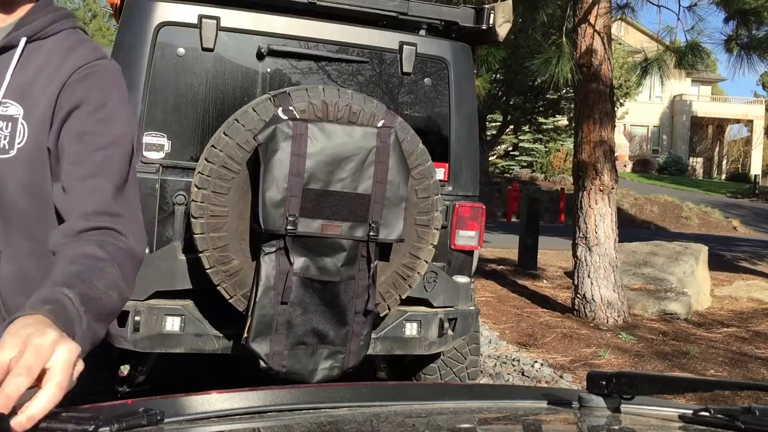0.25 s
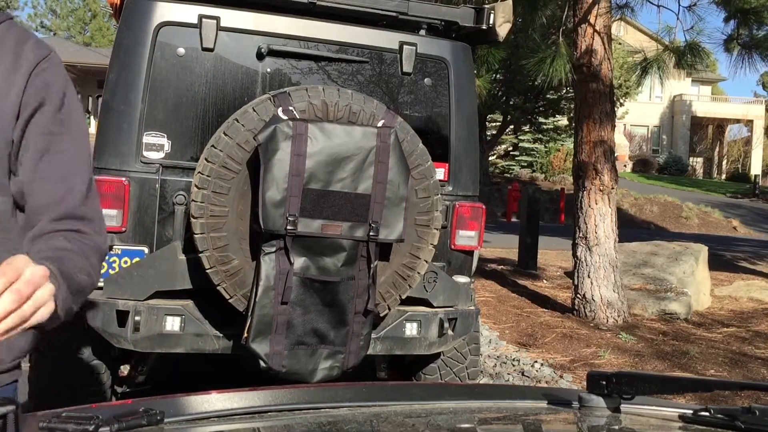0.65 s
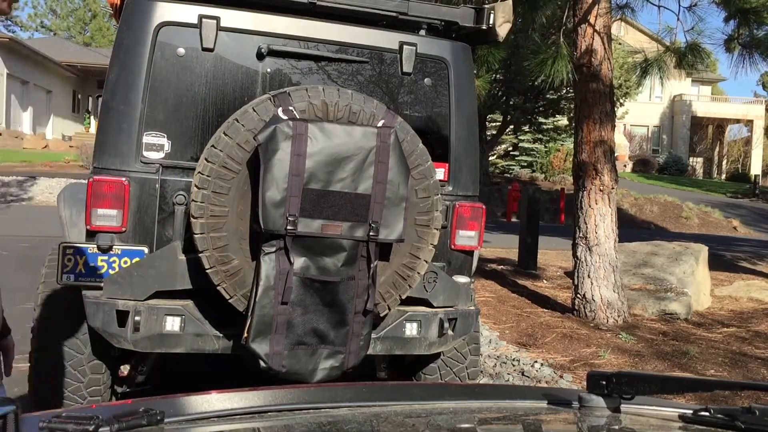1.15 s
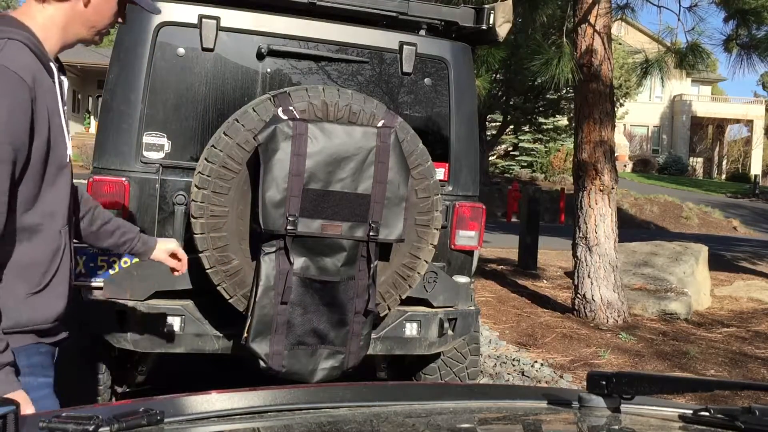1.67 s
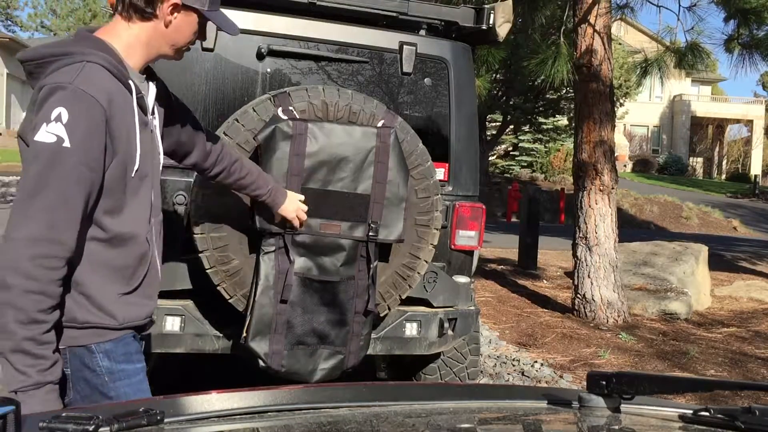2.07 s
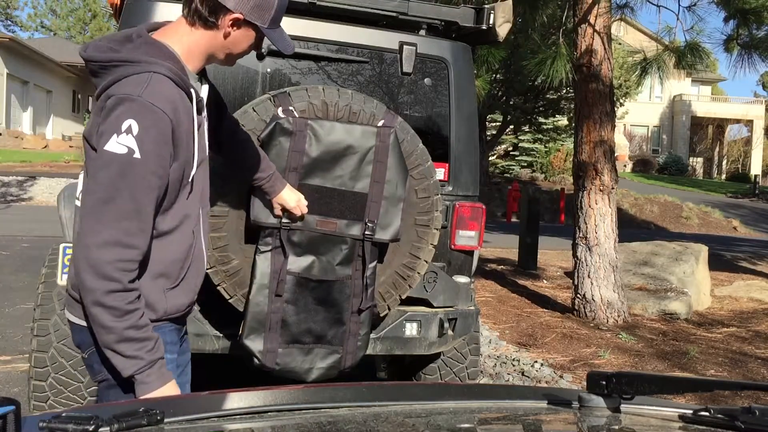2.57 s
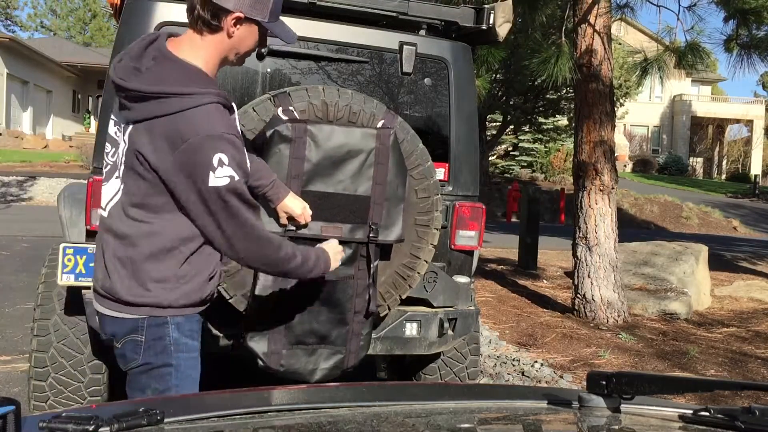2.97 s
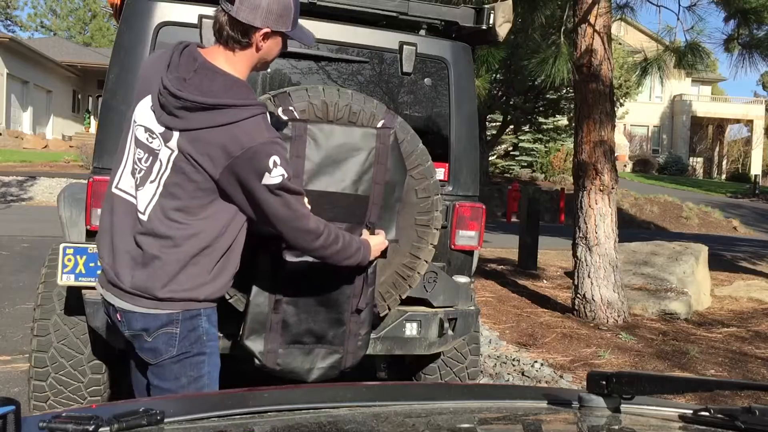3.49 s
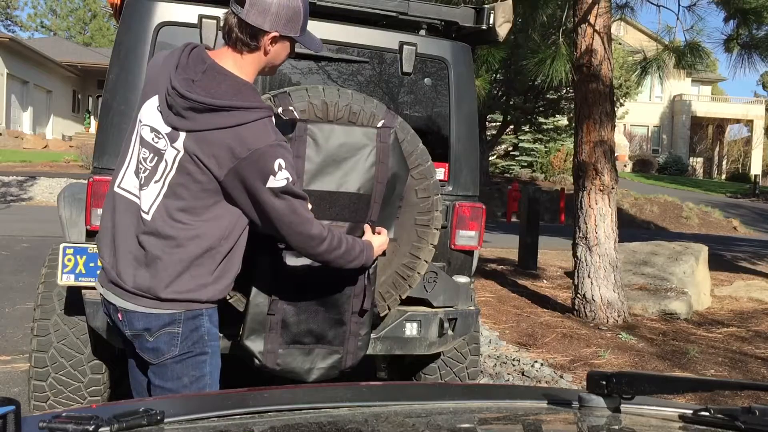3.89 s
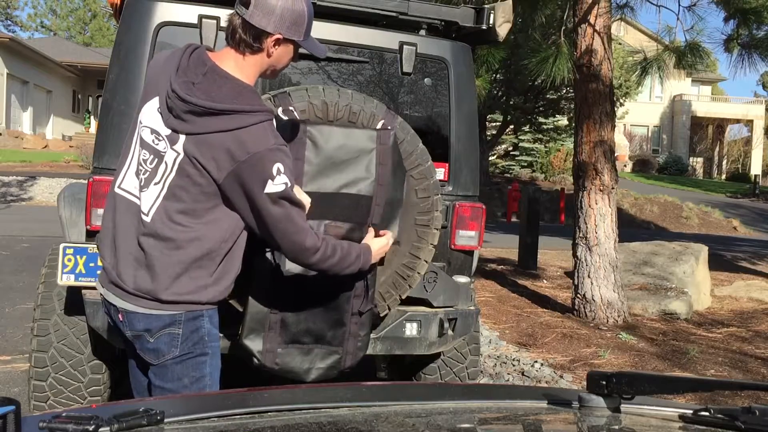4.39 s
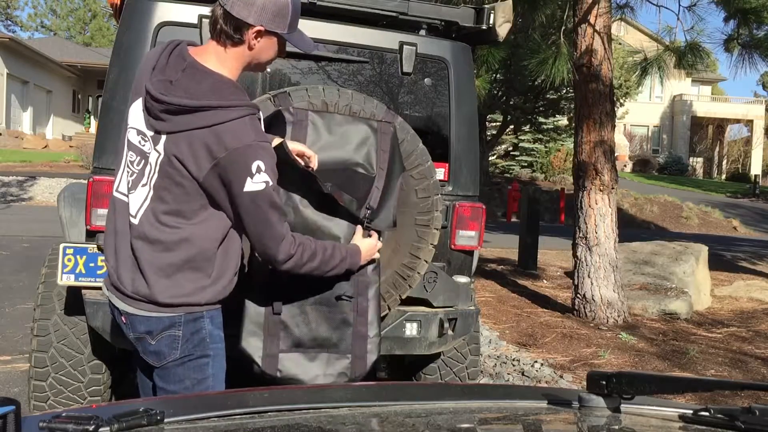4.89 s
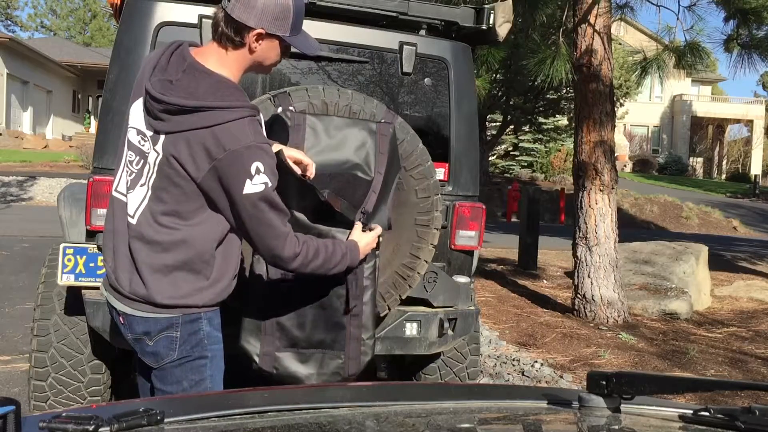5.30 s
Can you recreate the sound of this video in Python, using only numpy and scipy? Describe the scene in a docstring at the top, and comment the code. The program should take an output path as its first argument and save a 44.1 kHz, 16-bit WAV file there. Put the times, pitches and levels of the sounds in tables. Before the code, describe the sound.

Outdoors, something clatters loudly on sheet metal near the microphone; afterwards a nylon bag is quietly handled, with a plastic click and webbing swish.

```python
"""Outdoors, at a car: something scrapes on the steel hood and knocks it a few times.
Noise bursts and ringing panel modes make the knocks; rough noise keeps the modes ringing in the scrape.
A few steps away a nylon bag is handled: shaped noise for rubs, tugs, pats and a long strap pull,
and short ringing modes for a plastic buckle that snaps shut.
A faint low hum of three sines swells and sinks, far birds whistle as gliding sines, and air noise lies below."""
import sys
import numpy as np
from scipy import signal
from scipy.fft import rfft, irfft, next_fast_len
from scipy.io import wavfile
from scipy.ndimage import map_coordinates

SR = 44100
rng = np.random.default_rng(int(sys.argv[2]) if len(sys.argv) > 2 else 0)


def waveform_to_disk(signal):
    """Save audio, clipped to [-1, 1], as 16-bit WAV at the path in sys.argv[1]."""
    frames = np.transpose(np.atleast_2d(signal))
    scaled = np.clip(frames, -1, 1) * 32767
    samples = np.round(scaled).astype(np.int16)
    wavfile.write(sys.argv[1], SR, samples)


N = 244578  # length of the scene in samples
SIZE = 2 ** 15  # length of one short sound in samples
TOP_HZ = 16100  # upper limit of the sound
TIME = np.arange(N) / SR  # s from the start of the scene
AGE = np.arange(SIZE) / SR  # s from the start of a short sound
FREQ = np.fft.rfftfreq(SIZE, 1 / SR)  # Hz

# Ways in which the hood panel vibrates: f/Hz, level/dB, time to fall by 60 dB/s
HOOD_MODES = [(52, -24, .35), (84, -19, .3), (118, -12, .24), (168, -6, .18), (220, -6.5, .18),
              (247, -9, .2), (325, -6, .15), (372, -3, .14), (440, -9, .1), (531, -1, .1), (556, -2, .11),
              (592, -2, .12), (690, -10, .09), (787, -8, .09), (961, -5, .08), (1005, -6, .11),
              (1065, -9, .11), (1185, -3, .09), (1232, -3, .11), (1270, -6, .08), (1325, -5, .07),
              (1650, -11, .06), (1739, -11, .06), (1905, 1, .035), (2135, -3, .04), (2362, -16, .05),
              (2485, -18, .05), (3055, -14, .04), (3655, -10, .025), (4076, -14, .025), (5250, -18, .04),
              (5880, -21, .03), (6670, -23, .03)]
# Four bands, called bass, body, clack and crack: lower f/Hz, upper f/Hz
BANDS = [(60, 400), (400, 1500), (1500, 5000), (5000, 16000)]


def amp(db):
    """Turn decibels into an amplitude factor."""
    return 10 ** (np.asarray(db) / 20)


def unit(x):
    """Scale to rms 1."""
    return x / np.sqrt(np.mean(x ** 2) + 1e-20)


def norm(x):
    """Scale to energy 1."""
    return x / np.linalg.norm(x)


def along(points, hz):
    """Read a curve of (Hz, value) points on a logarithmic frequency axis."""
    f, values = np.transpose(points)
    return np.interp(np.log(hz + 1), np.log(f + 1), values)


def fade(t, t60):
    """Exponential decay by 60 dB in t60 seconds."""
    return np.exp(-np.log(1000) * t / t60)


def wobble(rate):
    """A smooth random curve with rate random points a second."""
    points = rng.standard_normal(int(N * rate / SR) + 4)
    return map_coordinates(points, [np.arange(N) * rate / SR])


def held(start, end, rise, fall):
    """Envelope in dB: 0 from start to end, with flanks of rise and fall dB per second."""
    return -rise * np.maximum(start - TIME, 0) - fall * np.maximum(TIME - end, 0)


def add(track, s, sound):
    """Mix a sound into the track at time s."""
    part = track[max(round(s * SR), 0):][:len(sound)]
    part += sound[:len(part)]


def coloured(x, points):
    """Filter a short sound to the (Hz, dB) response, with no output ahead of its cause (minimum phase)."""
    cepstrum = irfft(np.log(amp(along(points, FREQ))))
    # doubling the first half and dropping the second makes the filter causal
    fold = 1 + np.sign(SIZE // 2 - np.arange(SIZE))
    fold[0] = 1
    return irfft(rfft(x, SIZE) * np.exp(rfft(cepstrum * fold)))


def peaked(x, hz, peak_db, width):
    """Give a short sound a broad peak, width octaves to either side of hz."""
    return coloured(x, [(hz / 2 ** width, 0), (hz, peak_db), (hz * 2 ** width, 0)])


def tilted(tone, db, slope):
    """Band levels of one event: its kind's tone, raised by db and tilted by slope dB per octave about 1 kHz."""
    octaves = np.log2(BANDS).mean(axis=1) - np.log2(1000)
    return np.add(tone, db) + slope * octaves


def voiced(x, levels, span):
    """Filter a short sound smoothly to bring the rms of its first span seconds near the level of each band."""
    for _ in range(2):  # the second pass refines the first
        head = x[:int(span * SR)]
        power = 2 * np.abs(rfft(head, SIZE)) ** 2 / SIZE / len(head)
        points = []
        for db, (low, high) in zip(levels, BANDS):
            lack = db - 10 * np.log10(power[(FREQ > low) & (FREQ < high)].sum())
            # a third of an octave inside each band edge
            points += [(low * 2 ** (1 / 3), lack), (high / 2 ** (1 / 3), lack)]
        x = coloured(x, points)
    return x


def softened(x, cut_hz):
    """A softer contact passes less treble."""
    return signal.sosfilt(signal.butter(2, min(cut_hz, TOP_HZ), fs=SR, output="sos"), x)


def dying(t60s):
    """Noise in which each frequency dies at its own speed, from (Hz, s) points."""
    hz, t, z = signal.stft(rng.standard_normal(SIZE), SR, nperseg=128)
    z = z * fade(t, along(t60s, hz)[:, None])
    return norm(signal.istft(z, SR, nperseg=128)[1][:SIZE])


def ringing(modes, scatter_db, wander_hz=0):
    """Struck modes, at new strengths for every blow; their pitches wander as the surface flexes."""
    out = np.zeros(SIZE)
    for k, (hz, db, t60) in enumerate(modes):
        drift = np.interp(AGE, AGE[::256], rng.standard_normal(SIZE // 256))
        pitch = hz + wander_hz * np.sqrt(hz / 1000) * drift
        phase = 2 * np.pi * np.cumsum(pitch) / SR
        strength = (-1) ** k * amp(db + scatter_db * rng.standard_normal())
        out += strength * fade(AGE, t60) * np.sin(phase)
    return out


def noise(points):
    """Steady noise of rms 1 with the (Hz, dB) spectrum."""
    m = next_fast_len(N + SIZE)
    spectrum = rfft(rng.standard_normal(m)) * amp(along(points, np.fft.rfftfreq(m, 1 / SR)))
    return unit(irfft(spectrum, m)[:N])


def bent(x, travel):
    """Bending waves in sheet steel: treble runs faster and arrives first (travel sets the delay, s)."""
    delay = travel * np.maximum(np.sqrt(1000 / (FREQ + 60)) - np.sqrt(1000 / 10000), 0)
    return irfft(rfft(x) * np.exp(-2j * np.pi * np.cumsum(delay) * SR / SIZE))


def yard(x, wet_db, delay=0.0017):
    """Cars, ground and trees scatter a short echo after delay seconds; wet_db is relative to the direct sound."""
    # How long the echo lasts: f/Hz, time to fall by 60 dB/s
    echo_t60 = [(150, 0.28), (1000, 0.093), (3300, 0.12), (7000, .17), (14000, .16)]
    echo = norm(dying(echo_t60) * np.clip(AGE / delay - 1, 0, 1))
    return x + amp(wet_db) * signal.fftconvolve(x, echo)[:N]


def still_air():
    """Steady outdoor noise whose level drifts slightly."""
    # Colour of the outdoor background: f/Hz, level/dB
    air_colour = [(15, -40.5), (25, -13.5), (43, -2), (75, 1), (91, 3.5), (260, -9), (289, -6),
                  (368, -10.5), (410, -11), (495, -11.5), (895, -17), (1620, -20.5), (2420, -21),
                  (15500, -35)]
    return amp(-63.5 + .6 * wobble(3.5)) * noise(air_colour)


def hum(waver_db=1.5):
    """A low wavering hum with weak overtones swells, sags slowly and drops back."""
    # Path of the pitch before its small waver: t/s, f/Hz
    pitch_path = [(0, 104), (1.43, 102.8), (2.05, 100.7), (3.16, 99.95), (3.6, 92.5), (4.18, 102.6),
                  (4.72, 110.9), (5.04, 106), (5.55, 103)]
    # Swells: start t/s, end t/s, level at the start before the waver/dB
    swell_list = [(1.42, 3.169, -56.5), (3.548, 3.83, -64), (4.182, 4.7, -61), (4.869, 4.969, -68.5),
                  (5.38, 5.549, -63)]
    rest_db = -75.5  # between swells
    edge_db_per_s, sag_db_per_s = 178, 4.5
    swells = []
    for start, end, db in swell_list:
        sag = sag_db_per_s * (TIME - start)
        swells.append(db + held(start, end, edge_db_per_s, edge_db_per_s) - sag)
    level = np.maximum(np.max(swells, axis=0), rest_db)
    pitch = np.interp(TIME, *np.transpose(pitch_path)) + 2 * wobble(12)
    phase = 2 * np.pi * np.cumsum(pitch) / SR
    tone = np.sin(phase) + amp(-18.0) * np.sin(2 * phase) + amp(-29.5) * np.sin(3 * phase)
    return unit(tone) * amp(level + waver_db * wobble(22))


def bird(flutter_hz=32, flutter_db=4):
    """Each fluttering whistle glides to its last pitch and levels off there, swelling or trailing away."""
    # Whistles and pips: start t/s, length t/s, first f/Hz, last f/Hz, level before flutter/dB, swell/dB per s
    whistles = [(0.871, 0.031, 2410, 2320, -68, 0), (1.508, 0.027, 923, 890, -67, 0.5),
                (1.51, 0.044, 3210, 3014, -73.5, 0), (1.571, .028, 1353, 1342, -69.5, 0),
                (1.616, 0.027, 1310, 1270, -60.5, -1), (2.53, 0.13, 3070, 3168, -67, 0),
                (2.667, 0.16, 3163, 3172, -76, -40), (2.935, .095, 3900, 3280, -81, 0),
                (3.021, 0.064, 3145, 2900, -61.5, 80), (3.464, .12, 2480, 2540, -79, -0.5),
                (3.563, 0.09, 3420, 3220, -80.5, -0.5)]
    edge_s, glide = 0.012, 1.8  # fade in and out; how soon the pitch levels off
    out = np.zeros(N)
    for s, length, first, last, db, swell in whistles:
        left = np.clip(1 - (TIME - s) / length, 0, 1)  # share of the whistle still to come
        hz = last + (first - last) * left ** glide + flutter_hz * wobble(220)
        gate = np.clip(np.minimum(TIME - s, s + length - TIME) / edge_s, 0, 1)
        level = db + swell * length * (.5 - left) + flutter_db * wobble(60)
        out += gate * amp(level) * np.sin(2 * np.pi * np.cumsum(hz) / SR)
    return out


def nylon_rubs(width=0.98, grain_db=3.5, clump_db=2.0):
    """Ribs of the weave catch on each other in tiny clumped grains; each stroke swells and fades."""
    # Strokes of nylon on nylon: middle t/s, half length t/s (times width),
    # relative level/dB, brightness/dB per octave, pitch of the rasp f/Hz
    strokes = [(0.138, 0.015, -68.5, 0, 2260), (0.547, 0.017, -61.5, 0, 6900),
               (1.374, .022, -79.5, -0.5, 2200), (1.605, 0.028, -78.5, -1, 1300),
               (2.023, 0.013, -61, 1.7, 1725), (2.059, 0.013, -71, .6, 3290), (2.195, 0.02, -66, 0.5, 1104),
               (2.314, 0.017, -73, 1.5, 2830), (2.657, 0.028, -76, 3.5, 1302),
               (2.791, .03, -75.5, 0.5, 1300), (3.133, .013, -66, 4, 6000), (3.142, 0.011, -60, -3, 350),
               (3.19, 0.03, -73.5, 3.5, 2700), (4.306, 0.026, -67.5, 2, 890),
               (4.546, .024, -72.5, 3.5, 2400), (4.608, 0.021, -67, -3, 303), (4.887, 0.023, -65.5, 0, 458),
               (5.096, .011, -73, 0, 3000), (5.15, .02, -75.5, 0, 2900), (5.26, 0.026, -69.5, -0.1, 3005)]
    # Colour of the grains before the band levels are set: f/Hz, level/dB
    nylon_colour = [(70, -13), (160, -6), (300, 7), (600, -6.5), (950, -1), (1800, -6.5), (2500, -1.5),
                    (3200, -1.5), (3900, -8), (4900, -12.5), (6300, -5), (7500, -12.5), (9200, -7.5),
                    (16000, -32)]
    # Bass, body, clack and crack of any stroke: level/dB
    rub_tone = [0.5, -1, -0.5, -10]
    out = np.zeros(N)
    for s, half, db, brightness, hz in strokes:
        unevenness = grain_db * wobble(2000)[:SIZE] + clump_db * wobble(240)[:SIZE]
        grains = rng.standard_normal(SIZE) * amp(unevenness)
        rub = voiced(coloured(grains, nylon_colour), tilted(rub_tone, db, brightness), SIZE / SR)
        start = max(s - 4 * half, 0)
        speed = np.exp(-.5 * ((start + AGE - s) / (width * half)) ** 2)
        add(out, start, speed * peaked(rub, hz, peak_db=9, width=1.5))
    return out


def strap_pull(grain_db=0.5, uneven_db=1.53):
    """Webbing runs through its slider in one full, finely grained swish."""
    # Hiss of sliding webbing: f/Hz, level/dB
    webbing_colour = [(100, -15), (300, 16.5), (450, 5), (600, -14), (850, -2), (1200, -2), (2000, -3.5),
                      (2700, 1.5), (3200, 2.5), (3800, -13), (5000, -12.5), (6400, -7), (7500, -9.5),
                      (9300, -4), (11000, -12), (13500, -17), (15500, -15.5)]
    start_s, end_s, level_db = 4.67, 4.706, -51.5
    rise_db_per_s, fall_db_per_s = 191, 313  # it gathers speed, then slows
    swish = unit(noise(webbing_colour) * amp(grain_db * wobble(1500) + uneven_db * wobble(150)))
    return swish * amp(level_db + held(start_s, end_s, rise_db_per_s, fall_db_per_s))


def bag_taps(grain_db=2, slip_db=-3):
    """Webbing slips, then stops with a tick and soft thud; after a tug it catches again and the bag settles."""
    # Sharp tugs on the strap: t/s, rise t/s, relative level/dB, hardness/dB per octave, pitch f/Hz
    tugs = [(2.151, 0.00065, -59, -2.7, 1706), (2.156, 0.0014, -53, -2.5, 2010),
            (3.1075, 0.0041, -49, 2.64, 2690), (4.3174, 0.0033, -52, 0.4, 294.4),
            (4.5459, .001, -66, -4, 2470), (4.5839, 0.00064, -69, 1.5, 5230), (4.732, .001, -69, -4, 2507),
            (4.875, .0008, -72, -2, 1740), (4.9113, .0008, -71, -2.5, 1900),
            (4.9535, .0005, -74.5, -2, 1306), (5.091, .0015, -77, -2, 2940), (5.239, .0012, -76.5, 0, 2693),
            (5.281, 0.0012, -66, -2.5, 2400)]
    # Soft pats of hand and strap on the bag: t/s, relative level/dB, pitch f/Hz
    pats = [(1.63, -68.5, 1400), (3.187, -57.5, 490), (4.053, -71.5, 298), (4.277, -63.5, 947),
            (4.371, -67.5, 339), (4.6237, -54.5, 855), (4.6353, -50.5, 900), (4.741, -62.5, 285),
            (4.888, -59.5, 1814), (4.955, -63.5, 686), (5.345, -70.5, 299.4)]
    # Bass, body, clack and crack of any tug, and of any pat: level/dB
    tug_tone = [-1, -1, -1.5, -3.5]
    pat_tone = [0.5, -2.5, -18.5, -30]
    # Colour of the bag before the band levels are set: f/Hz, level/dB
    bag_colour = [(60, -1), (170, 0.5), (270, 13.5), (340, 8), (480, 2.5), (640, -5.5), (900, -5),
                  (1150, -10), (1500, -2.5), (1900, -15.5), (2700, -2), (4500, -9.5), (6300, -9),
                  (10000, -12.5), (16000, -19)]
    # How long the stop lasts: f/Hz, time to fall by 60 dB/s
    bag_t60 = [(200, 0.043), (600, 0.046), (2500, 0.0095), (10000, 0.038)]
    pat_rise_s = .001
    catch_s, catch_db = .0095, -12  # the strap catches a second time
    settle_s, settle_db, settle_hz = 0.021, -22, 327  # then the bag settles back with a thud

    taps = [(s, pat_rise_s, np.add(pat_tone, db), hz) for s, db, hz in pats]
    for s, rise, db, hardness, hz in tugs:
        taps.append((s, rise, tilted(tug_tone, db, hardness), hz))
        taps.append((s + catch_s, pat_rise_s, tilted(tug_tone, db + catch_db, hardness), hz))
        taps.append((s + settle_s, pat_rise_s, np.add(pat_tone, db + settle_db), settle_hz))

    out = np.zeros(N)
    lead, span = .01, .032  # s: room for the slip ahead of the stop; stretch in which the level is set
    for s, rise, levels, hz in taps:
        growth = np.exp(-np.abs(AGE - lead) / rise) * (AGE < lead + rise / 2)
        slip = rng.standard_normal(SIZE) * growth
        stop = np.roll(dying(bag_t60), int(lead * SR))
        contact = (amp(slip_db) * norm(slip) + stop) * amp(grain_db * wobble(900)[:SIZE])
        tap = voiced(coloured(contact, bag_colour), levels, span)
        add(out, s - lead, peaked(tap, hz, peak_db=10.5, width=0.89))
    return out


def buckle(crack_db=-10, crack_t60=0.01, attack=0.00043):
    """Each prong springs into the housing and rings the plastic briefly."""
    # The buckle's two prongs catch: t/s, relative level/dB
    prongs = [(3.2322, -18.5), (3.2463, -26.5)]
    # Ringing of the plastic: f/Hz, level/dB, time to fall by 60 dB/s
    plastic_modes = [(2640, -2, 0.0044), (3270, 3, 0.011), (3330, -35, 0.07), (3660, -10, 0.0087),
                     (5580, -13.5, 0.007), (6240, -15.5, 0.0083), (6840, -14, 0.0071)]
    # Colour of a prong's crack: f/Hz, level/dB
    crack_colour = [(150, -20), (330, 2), (520, 6), (950, -15), (1600, -3), (2400, 13), (4700, -13),
                    (7000, -0.5), (15000, -23)]
    out = np.zeros(N)
    for s, db in prongs:
        crack = coloured(rng.standard_normal(SIZE) * fade(AGE, crack_t60), crack_colour)
        ring = ringing(plastic_modes, scatter_db=1.0) * (1 - np.exp(-AGE / attack))
        add(out, s, amp(db) * (ring + amp(crack_db) * crack))
    return out


def hood_scrape(rough_db=5, contact_db=-4.5, ring_db=-2.0):
    """An uneven, chattering slide over the hood keeps its modes ringing."""
    # Colour of the sliding contact: f/Hz, level/dB
    slide_colour = [(40, -22), (160, -5), (600, -1), (1250, -3), (2000, -10), (2900, -12), (4200, -17),
                    (6000, -24.5), (9500, -36), (12800, -31), (15500, -42)]
    start_s, end_s, push_db = .3225, .394, -36  # level before the contact and ring shares
    rise_db_per_s, fall_db_per_s = 3500, 420  # it bites at once and runs out more slowly
    slip = noise(slide_colour) * amp(rough_db * wobble(330))
    push = unit(slip) * amp(push_db + held(start_s, end_s, rise_db_per_s, fall_db_per_s))
    # Colour of the ringing: f/Hz, level/dB
    ring_colour = [(150, -3), (330, 0), (460, -3.5), (600, 7), (800, -1), (1200, 3),
                   (2000, -3), (2500, 7), (4000, -1)]
    modes = coloured(ringing(HOOD_MODES, scatter_db=3.0, wander_hz=7.8), ring_colour)
    ring = signal.fftconvolve(push, modes)[:N]
    return amp(contact_db) * push + amp(ring_db) * norm(ring) * np.linalg.norm(push)


def hood_knocks(travel=0.0035, touch=.0007, touch_db=-1, edge_db=0, edge_t60=.024, modes_db=-2.0, tail_db=-11):
    """Each knock runs through the panel as a falling chirp, returns from its edges and leaves it ringing."""
    # Knocks: t/s, relative level/dB, hardness/dB per octave, contact cut-off f/Hz (TOP_HZ at most),
    # pitch of the clack f/Hz, boost of the clack before the band levels are set/dB
    knocks = [(0.2805, -39.5, -2, 9100, 3800, 10), (0.299, -57, 0, 12000, 5300, 3),
              (0.3205, -45, -2, 3000, 1151, 9), (0.3343, -46, 0.6, 15000, 5530, 8),
              (0.345, -42.5, -1, 7000, 4240, 13), (0.3795, -32.5, 0.86, 15200, 1300, 7),
              (0.4156, -45.5, -1, 7000, 2540, 6), (0.547, -27, 0.26, 3500, 4100, 13),
              (0.5769, -47, 0.8, 6000, 4200, 7.5), (0.5892, -17.5, 0.1, 8900, 3850, 14),
              (0.6292, -26, 0.78, 7640, 3925, 13), (0.6543, -60, 1.5, 6970, 4060, 16.5),
              (0.6936, -62.5, 1.5, 6500, 4060, 18)]
    # Bass, body, clack and crack of any knock: level/dB
    knock_tone = [-4.5, 0, -2, -13.5]
    # Colour of a blow on the hood before the band levels are set: f/Hz, level/dB
    blow_colour = [(30, -26), (110, -2), (280, 2), (500, 8), (1300, 1.5), (2100, 1), (2750, -8),
                   (3700, -7.5), (4300, -9), (4800, -17), (5400, -10.5), (8000, -20.5), (10500, -24),
                   (12800, -18.5), (16000, -29)]
    # What the edges of the panel send back: f/Hz, level/dB
    edge_colour = [(100, -8.5), (500, -3.5), (1300, 3), (2000, 1), (2700, 3.5), (4000, -6), (5500, -2),
                   (12000, -2)]
    # How long the panel's diffuse tail lasts: f/Hz, time to fall by 60 dB/s
    panel_t60 = [(60, .4), (250, 0.17), (700, .14), (1400, .17), (2500, 0.043), (4000, 0.1), (12000, 0.06)]
    out = np.zeros(N)
    for s, db, hardness, cut_hz, clack_hz, clack_db in knocks:
        # the hard surfaces chatter for a millisecond or two as they meet
        chatter = norm(rng.standard_normal(SIZE) * AGE * np.exp(-AGE / touch))
        contact = signal.unit_impulse(SIZE, int(touch * SR)) + amp(touch_db) * chatter
        early = norm(rng.standard_normal(SIZE) * fade(AGE, edge_t60) * (1 - np.exp(-AGE / 0.006)))
        returns = coloured(amp(edge_db) * early + amp(tail_db) * dying(panel_t60), edge_colour)
        ring = ringing(HOOD_MODES, scatter_db=2.0, wander_hz=20) * (1 - np.exp(-AGE / touch))
        panel = norm(coloured(contact + returns, blow_colour)) + amp(modes_db) * norm(ring)
        clack = peaked(panel, clack_hz, clack_db, width=.27)
        levels = tilted(knock_tone, db, hardness)
        knock = voiced(bent(clack, travel), levels, span=.025)[:SIZE // 2]
        add(out, s, softened(knock, cut_hz))
    return out


def scene():
    """Still air, a hum and distant birds, the bag farther off and the near knocks and scrape."""
    background = still_air() + hum() + yard(bird(), wet_db=-0.5)
    bag = yard(nylon_rubs() + strap_pull() + bag_taps(), wet_db=-12.5) + yard(buckle(), wet_db=-10.0)
    hood = hood_scrape() + hood_knocks()
    return (background + bag + hood)[None]


def record(dry, low_hz=36):
    """The microphone weakens the deepest bass, and nothing above TOP_HZ is kept."""
    thin = signal.sosfilt(signal.butter(4, low_hz, "highpass", fs=SR, output="sos"), dry)
    m = next_fast_len(N + SIZE)
    kept = np.fft.rfftfreq(m, 1 / SR) < TOP_HZ
    return irfft(rfft(thin, m) * kept, m)[..., :N]


dry = scene()
out = record(dry)
waveform_to_disk(out)
```